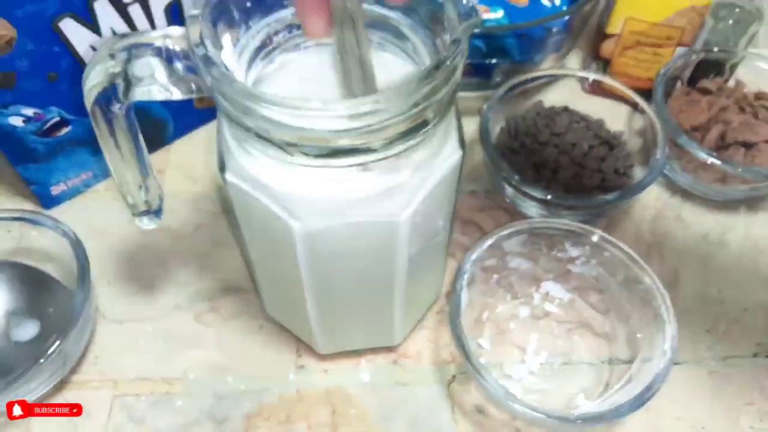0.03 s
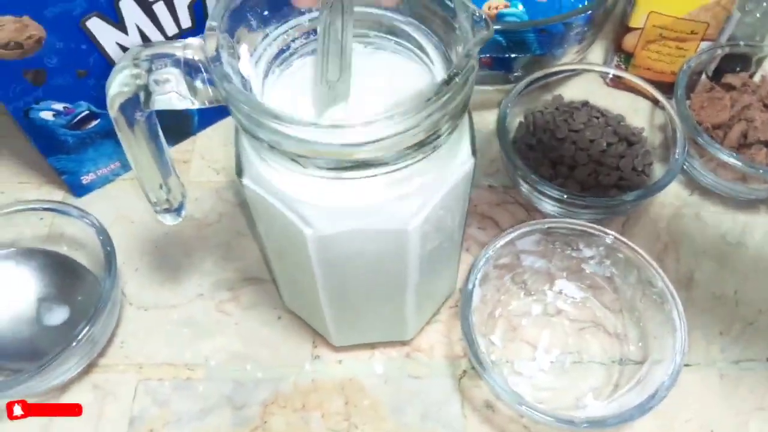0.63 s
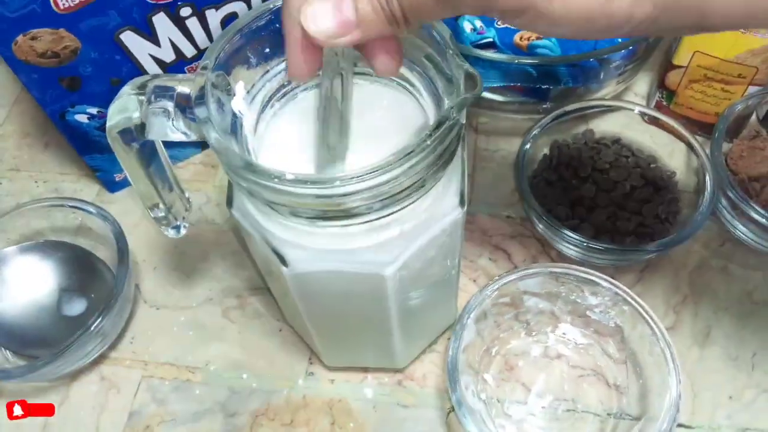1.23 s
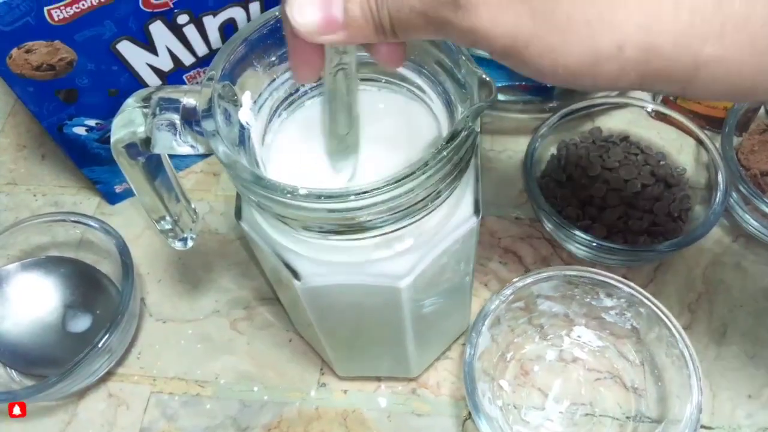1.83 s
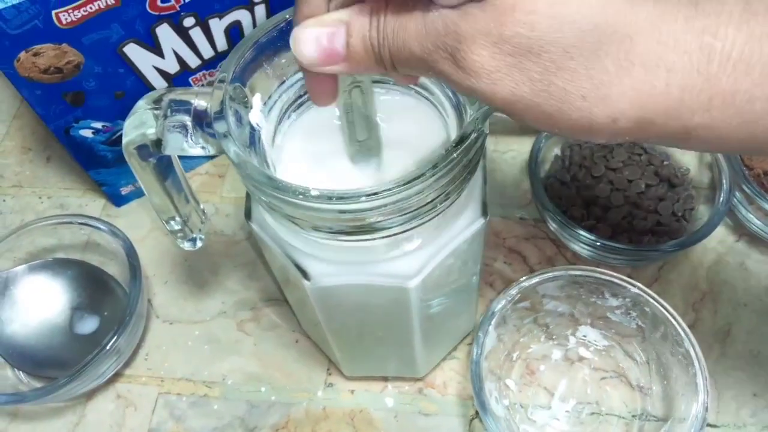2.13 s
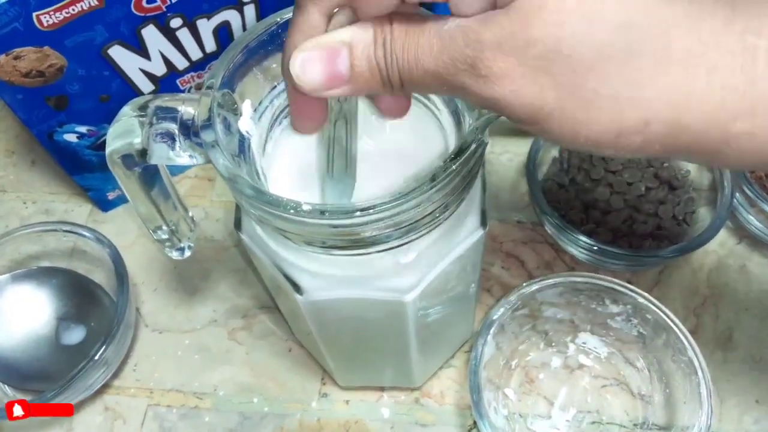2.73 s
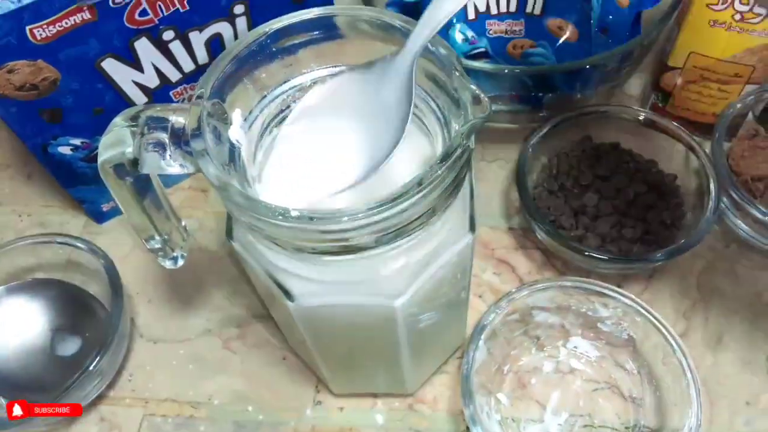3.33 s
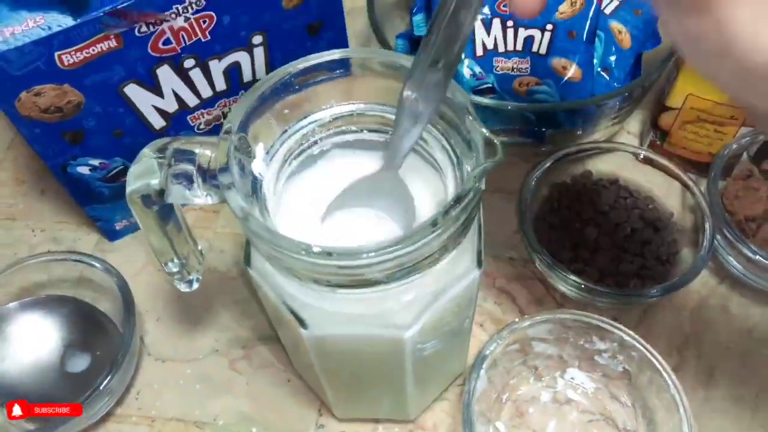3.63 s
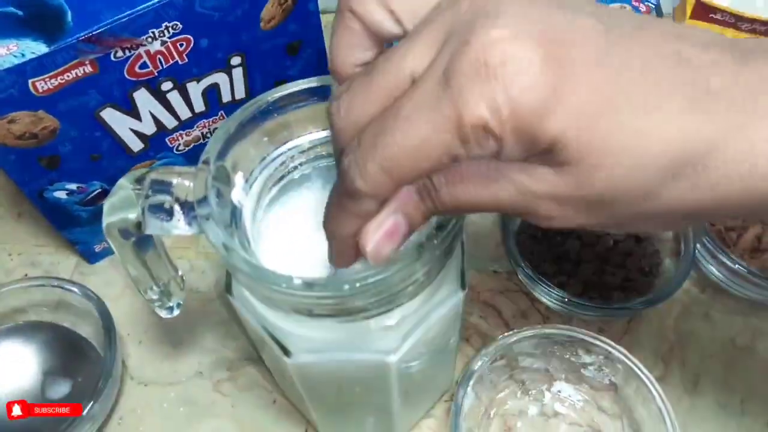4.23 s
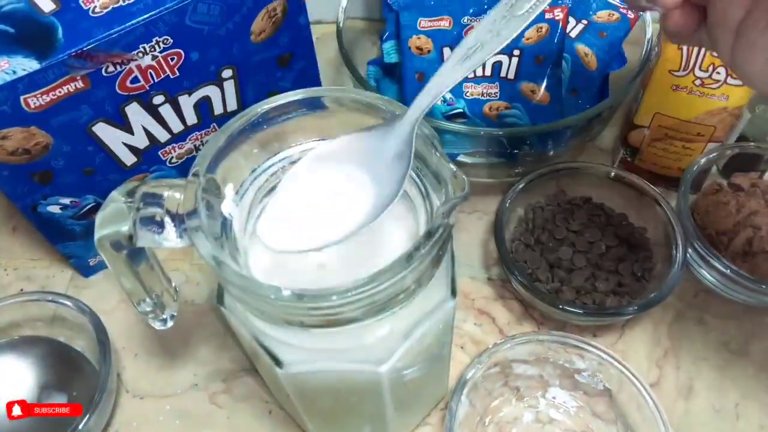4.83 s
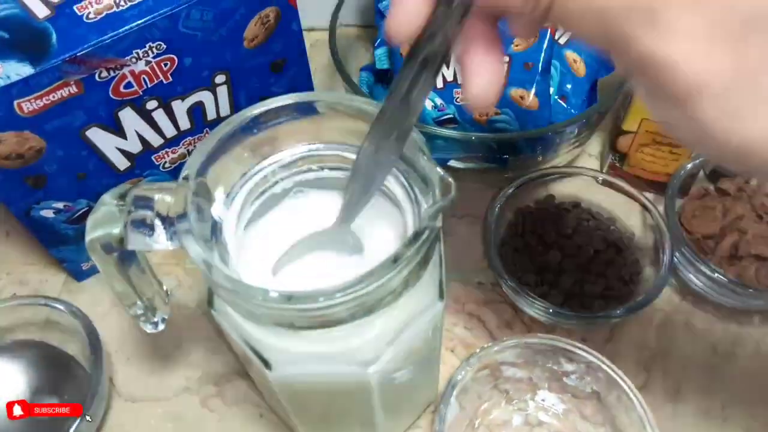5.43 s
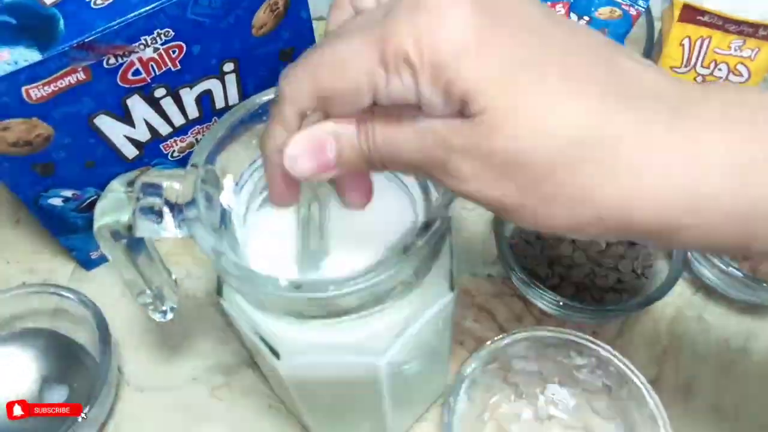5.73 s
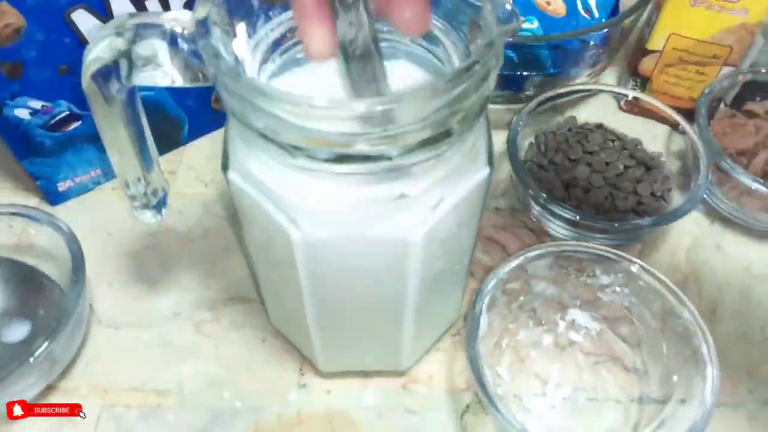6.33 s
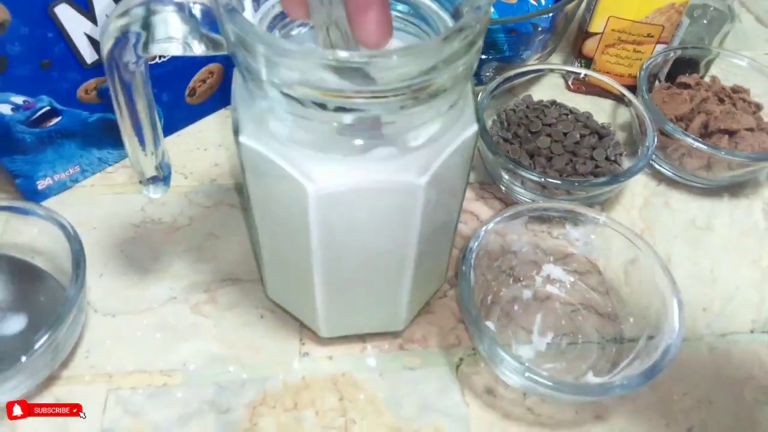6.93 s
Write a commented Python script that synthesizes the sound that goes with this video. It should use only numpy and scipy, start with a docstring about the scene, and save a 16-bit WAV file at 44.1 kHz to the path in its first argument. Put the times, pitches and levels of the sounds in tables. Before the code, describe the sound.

From the start, a steel spoon stirs milk in a thick glass jug, close by. It makes bright, short, damped clinks, around a dozen a second and uneven in strength, with gritty little scrapes between them. The milk sloshes softly underneath, with an occasional small plop. The stirring is liveliest around 2 seconds and dies away just after 3. At about 3.9 seconds comes one sharper, ringing clink, followed by a few lighter taps and a small gulp of milk until 4.6. After a near-silent pause, the stirring resumes at 5.5 seconds, with quick, slightly more ringing clinks, stronger, faintly squeaky scrapes and more plops, continuing to the end at about 7 seconds. The small kitchen gives a very short echo, and a faint steady hiss and whirr lie behind everything.

```python
"""Stirring milk in a glass jug

A steel spoon goes round a thick glass jug in two bouts, with a few loose taps between. Each touch
rings glass and spoon briefly, damped by the milk and the fingers. Between touches the spoon drags
over the glass while the milk sloshes and plops. A small kitchen answers, over faint hiss and whirr."""
import sys
import numpy as np
from scipy import signal
from scipy.fft import rfft, irfft, next_fast_len
from scipy.io import wavfile

SR = 44100
rng = np.random.default_rng(int(sys.argv[2]) if len(sys.argv) > 2 else 0)


def inscribe(sig):
    """Save sig as 16-bit PCM at rate SR to the path in sys.argv[1].

    A 1-D sig is mono; a 2-D sig holds one channel per row.
    Samples are clipped to [-1, 1] before scaling.
    """
    pcm = np.round(np.clip(np.atleast_2d(sig).T, -1, 1) * 32767)
    wavfile.write(sys.argv[1], SR, pcm.astype(np.int16))


N = 307377
AGE = np.arange(int(.16 * SR)) / SR   # seconds into one short ring

# Spoon meets glass. Each row: start in seconds, strength in dB, body knock in dB re strength,
# hardness in dB (high for the spoon's edge, low for its back), pitch in Hz.
TOUCHES = [(0.0136, -26, -5.5, -5.5, 4060), (0.0343, -38.5, -5.5, 2, 4100), (0.0822, -26.0, -12, 3, 4160),
           (0.1777, -29, -1.5, -2.0, 3330), (0.2451, -30, -8.0, 5.5, 4260), (0.285, -36.5, -4, 5.5, 4630),
           (0.3399, -25.5, -4.5, -4.5, 3580), (0.399, -31, -11.5, 2.5, 3670),
           (0.4469, -34.5, -10.5, 2.5, 4370), (0.4985, -28, -7.5, -2, 3520), (0.5506, -25.5, -13, 1, 3740),
           (0.5951, -28.5, -7.5, 2.5, 3700), (0.6644, -26, -9, -1.5, 3600), (0.7564, -37, 3, 7, 4100),
           (0.7697, -33, -17, 0.5, 4020.0), (0.8243, -29, -4.5, -1.5, 3610), (0.8408, -43.5, 6, 2, 4300),
           (0.9172, -28, -14, -2.5, 3930), (0.9653, -37.5, -5, -1.0, 3500), (1.029, -34, -2.5, 7.5, 3840),
           (1.0612, -28.5, -7, 4, 4100), (1.143, -37.0, 4.5, 0.5, 4450.0),
           (1.1854, -37.5, -3, 10.5, 3740.0), (1.316, -38.5, 0, 2, 4470.0),
           (1.3354, -27.5, -15.5, 3.5, 3930), (1.3623, -31, -7, 5.0, 3520), (1.3739, -34, -3.5, 1.0, 4300),
           (1.4772, -25.5, -8, -1, 3830.0), (1.5322, -29.5, -13, -1, 4280),
           (1.5663, -30.5, -4.5, -8, 3950.0), (1.5745, -38.0, -18, 8.5, 3480.0),
           (1.5956, -37.5, 8, 3, 4370.0), (1.6293, -33.5, -12.5, 3.5, 4400), (1.635, -33.5, -2, 8, 4270.0),
           (1.6659, -27.5, -9.5, -1.5, 4350), (1.7209, -33, -10, -1, 3490), (1.7742, -31.5, -7, 9.5, 3700),
           (1.7892, -41.5, 5, 9, 4400), (1.8134, -33, -8, 0, 4200.0), (1.9571, -39.5, -2, -2, 4120),
           (2.0031, -36, 3.5, 3.5, 3320.0), (2.0493, -30.0, -8, 4, 3980), (2.0831, -27, -9.5, 0, 4330),
           (2.1253, -39.5, 6.5, 1.5, 4430), (2.1616, -29.5, -9, -5, 3680), (2.167, -38.5, 3.5, 2, 4290.0),
           (2.2024, -31, -16, 6.5, 4300), (2.23, -29.5, -7.5, 1.5, 4000), (2.2449, -33.5, 1, -15, 4030),
           (2.3088, -38, 2, 3, 4000), (2.3689, -38.5, -2, 3.5, 4000), (2.392, -28.5, -7.5, -3.5, 4080),
           (2.4443, -30.5, -3, -7, 3430.0), (2.5445, -35.5, -6, 1.5, 3950.0),
           (2.5608, -38.0, -7, 0, 4340.0), (2.6151, -26.5, -7, -7.5, 4320), (2.6686, -31.5, -6.5, -2, 4210),
           (2.723, -32, -11.5, 0, 4100), (2.728, -32.5, -10.0, -5, 4040), (2.8102, -38, 4.5, -1, 3680),
           (2.8916, -32, -1, 6.5, 3990), (2.9626, -35.5, 0, 4.5, 3680.0), (2.99, -34.5, -3.5, -5, 3890.0),
           (3.0301, -35, -6, 6.5, 4300), (3.0593, -37, -2.5, 0, 3520), (3.139, -43.5, -7, -3, 3610),
           (3.9113, -19.5, -27, -12.5, 3620), (3.9853, -39, 1, 4.5, 4190.0),
           (4.0123, -39.5, -10, 6.5, 3840), (4.1436, -33, -14, -2.5, 3960.0), (4.2352, -43, -3, -9, 3320),
           (4.3044, -34.5, -2.5, 0.5, 4360.0), (4.3965, -35.5, -15.5, -12, 4280),
           (4.4265, -28.0, -14.5, -3, 3670), (4.6034, -43.5, -5.5, -9, 3750),
           (5.5349, -26.5, -8.5, -10.5, 3750), (5.6015, -33.5, -7.5, -10, 4270.0),
           (5.7046, -25, -22, 1, 4140), (5.7209, -28.0, -17, -2.5, 4200), (5.8078, -29.5, -7.5, -3.5, 3750),
           (5.8889, -32.5, -4, 2, 4130.0), (5.9049, -26.5, -42, -6, 4210), (5.9346, -34, -20, -2, 4210),
           (5.9758, -35.5, 2, 2.5, 3680.0), (6.073, -26.5, -21, 3, 4360), (6.134, -29, -11, -13, 3640),
           (6.15, -31.5, -6, -3.5, 3850), (6.1886, -24.5, -35, -2.5, 3830), (6.2278, -26, -15, -2.5, 4290),
           (6.302, -26.5, -7.5, -4, 3570), (6.3254, -31.5, -4.5, -2, 3850), (6.3715, -34, -28, 0, 3900),
           (6.3926, -26.5, -16, 1.5, 3690), (6.4609, -24.5, -20, -9.5, 3480),
           (6.5371, -22, -18, -0.5, 4190), (6.6238, -39, 6, 6.5, 3360), (6.7001, -27, -15, 4, 3670.0),
           (6.7658, -29.5, -7.5, -2.5, 3590.0), (6.8117, -25, -14, -3, 3530),
           (6.858, -28.5, -17.5, 4.0, 3520), (6.9348, -37.5, -5, 3.5, 3770),
           (6.9545, -28.0, -3.5, -4, 4370)]
# A loosely held spoon rings longer and lets the wall sing. Each row: time in seconds, looseness in dB.
GRIP = [(0, -5), (1.6, -3.5), (3.1, -5), (3.9, 5), (4.3, -5.5), (5.54, 11), (5.75, -0.5), (6.97, 6.5)]
# Modes of the free wall above the milk, of the main clink, and the high ones of spoon and glass.
# Each row: pitch in Hz, relative level in dB, t60 in seconds before grip or pressure alters it.
WALL_MODES = [(2434, -2, 0.033), (2573, -2.5, 0.069), (2960, -11, 0.025)]
CLINK_MODES = [(3595, -12.5, 0.044), (3750, 0.5, 0.014), (3820, -13, 0.035), (4290, -9.5, 0.081),
               (4290, -9, 0.064)]
TREBLE_MODES = [(5820, -12.5, 0.16), (6090, -11, 0.035), (6377, 5.5, 0.031), (6770, -0.5, 0.061),
                (7280, -14, 0.034), (7480, -13, 0.11), (7930, -2.5, 0.024), (8640, -7, 0.035),
                (10430, -27, 0.044)]
# The crowd of short-lived modes in a contact's crack. Each row: frequency in Hz, spectral level in dB.
CRACK_COLOUR = [(150, -35), (400, -17.5), (1000, -5.5), (1900, -11), (3000, 4), (4000, 9), (5100, 0),
                (6600, 4), (8500, -2), (10500, -14), (13800, -29), (16000, -21.5)]
# Air pockets closing behind the spoon.
# Each row: start in seconds, level in dB, first bubble's pitch in Hz, number of bubbles.
AIR_POCKETS = [(0.179, -19, 1765, 1), (1.257, -29.5, 1180, 1), (1.566, -25.5, 1860, 1),
               (2.312, -18.5, 987, 1), (3.166, -34.5, 690, 2), (4.269, -30.5, 1070, 2),
               (4.279, -26, 420, 3), (4.478, -40.5, 1260, 2), (5.188, -46, 1210, 1),
               (5.537, -24.5, 1496, 1), (5.812, -26.5, 1150, 1), (5.992, -28, 1310, 3),
               (6.252, -27, 1464, 1), (6.415, -32, 1890, 1), (6.589, -33, 1590, 1)]


def clinks(usual_t60=0.033, usual_hz=3920, usual_db=-33, rise_s=0.0013, rebound_s=.014):
    """Each touch cracks and rings in four registers, balanced by grip and hardness, then bounces once."""
    # Low modes of the filled jug. Each row: pitch in Hz, relative level in dB, nominal t60 in seconds.
    body_modes = [(432.3, -17, 0.11), (718, -7.5, 0.019), (1021.6, -1, 0.063), (1293, -19.5, 0.18),
                  (1519, -3, 0.035), (2290, -29, .04)]
    start, db, knock_db, hard_db, hz = np.transpose(TOUCHES)[:, :, None]
    loose_db = curve(GRIP, start)
    t60 = usual_t60 * from_db(0.14 * loose_db)
    damping = np.sqrt(usual_t60 / t60)
    # hard or forceful touches are over sooner
    slowness = from_db(-0.42 * hard_db - 0.64 * (db - usual_db))
    rise = 1 - np.exp(-AGE / (rise_s * slowness))

    def register(rings, crack_db, band_hz):
        """Hard or tightly damped touches have more crack and less ring."""
        crack = from_db(crack_db + 0.11 * hard_db) * damping ** 2 * cracks(band_hz, slowness)
        return unit_attack(unit_attack(rings * rise) + crack)

    # the strongest mode moves with the grip and the depth of the spoon
    main_mode = from_db(5) * np.sin(2 * np.pi * hz * AGE) * dying(AGE, t60)
    clink = register(main_mode + ringing(CLINK_MODES, damping, detune=0.0098),
                     crack_db=-4 - loose_db / 2, band_hz=(3200, 5000))
    body = register(ringing(body_modes, damping, detune=0.02), crack_db=-1, band_hz=(100, 2000))
    wall = register(ringing(WALL_MODES, from_db(-loose_db / 2), detune=0.012),
                    crack_db=-2 - loose_db, band_hz=(2000, 3200))
    treble = register(ringing(TREBLE_MODES, damping, detune=0.0169),
                      crack_db=2 - 0.73 * loose_db, band_hz=(5000, 15200))
    # loose, knocking or low-pitched touches drive the wall harder
    wall_db = -4.5 + 0.13 * loose_db + 0.22 * knock_db - 13 * np.log2(hz / usual_hz)
    timbre = clink + from_db(knock_db) * body + from_db(wall_db) * wall + from_db(hard_db) * treble
    hits = from_db(db) * timbre
    out = np.zeros(N)
    for at, hit, (late, lively) in zip(start[:, 0], hits, rng.standard_normal((len(hits), 2))):
        add(out, at, hit)
        add(out, at + rebound_s * np.exp(late / 2), from_db(-16.5 + 3 * lively) * hit)
    return out


def ringing(modes, damping, detune, uneven_db=2.5):
    """One ring per touch: the contact point sets each mode's strength, swirling milk shifts its pitch."""
    rings = 0
    for hz, db, t60 in modes:
        strength, shift, side = rng.standard_normal((len(TOUCHES), 3)).T[:, :, None]
        swing = np.sin(2 * np.pi * hz * (1 + detune * shift) * AGE) * np.sign(side)
        rings = rings + from_db(db + uneven_db * strength) * swing * dying(AGE, t60 / damping)
    return rings


def cracks(band_hz, slowness, contact_s=0.0016, tail_db=-13, tail_t60=0.18):
    """One crack per touch: a burst while steel chatters on glass, then the crowd of modes dies away."""
    size = len(TOUCHES) * len(AGE)
    crowd = band(noise(CRACK_COLOUR, next_fast_len(size)), band_hz)
    crowd = crowd[:size].reshape(len(TOUCHES), -1)
    progress = AGE / (contact_s * slowness)
    burst = progress * np.exp(1 - progress)
    return unit_attack(crowd * (burst + from_db(tail_db) * dying(AGE, tail_t60)))


def ticks():
    """The spoon's tip brushes the glass at random, louder as the stirring gets livelier."""
    force = excite(abs(grains(per_s=22, spread_db=2.5)), dying(AGE, t60=.014))
    return from_db(vigour() - 3) * unit_rms(force * band(noise(CRACK_COLOUR, N), (940, 15000)))


def dragging(t60_scale=0.34, squeak_hz=6550, squeak_width_hz=1000):
    """Slips of steel over glass, a few strong among many tiny, ring the modes the pressed spoon damps."""
    slips = abs(grains(per_s=1500, spread_db=5.5)) / 2 + abs(grains(per_s=140, spread_db=5))
    force = excite(slips, dying(AGE, t60=0.011))
    loose_db = curve(GRIP, np.arange(N) / SR)

    def rubbed(modes):
        """Each mode feels the slips in its own way."""
        rings = 0
        for hz, db, t60 in modes:
            ring = np.sin(2 * np.pi * hz * AGE) * dying(AGE, t60 * t60_scale)
            rings = rings + from_db(db) * excite(force * rng.standard_normal(N), ring)
        return unit_rms(rings)

    grit = unit_rms(force * band(noise(CRACK_COLOUR, N), (1330, 10500)))
    # the bowl of a loosely held spoon sings out as it skids
    squeak = force * rng.standard_normal(N)
    for _ in range(2):
        squeak = resonate(squeak, squeak_hz, squeak_width_hz)
    wall = from_db(loose_db - 6) * rubbed(WALL_MODES)
    glass = wall + from_db(-2) * rubbed(CLINK_MODES) + from_db(-3) * rubbed(TREBLE_MODES)
    return unit_rms(glass + from_db(1 - loose_db / 2) * grit + from_db(loose_db - 2) * squeak)


def pressure(drag_db=-51, usual_vigour_db=-42.5, skid_db=-22.5, fade_s=0.017):
    """The spoon's pressure as a gain: a running drag, a skid after each touch, and the scrapes."""
    # The spoon pressed along the wall. Each row: start in seconds, length in seconds, level in dB.
    scrapes = [(0.274, 0.065, -37), (1.198, 0.069, -41), (1.787, 0.21, -41), (5.565, 0.085, -47.5),
               (5.658, 0.049, -32.5), (5.754, 0.036, -36), (5.975, 0.047, -38.5), (6.392, 0.067, -36.5),
               (6.528, 0.064, -34), (6.624, 0.075, -32.5)]
    power = from_db(drag_db + 1.8 * (vigour() - usual_vigour_db)) ** 2
    for start, db, *_ in TOUCHES:
        add(power, start, (from_db(db + skid_db) * dying(AGE, t60=.25)) ** 2)
    for start, length_s, db in scrapes:
        t = np.arange(int(length_s * SR)) / SR
        swell = np.minimum(np.minimum(t, length_s - t) / fade_s, 1)
        add(power, start, (from_db(db) * swell) ** 2)
    return np.sqrt(power)


def vigour(settle_db_per_s=40):
    """How hard the milk is stirred, in dB; it calms down outside the bouts."""
    # One curve for each bout of stirring. Each row: time in seconds, vigour in dB.
    bouts = [
        [(0.0, -52), (0.39, -46.5), (0.85, -48), (1.74, -40.5), (2.28, -42), (2.96, -49), (3.3, -63)],
        [(5.55, -80), (5.588, -45), (5.712, -51.5), (6.162, -44.5), (6.526, -41.5), (6.902, -51), (6.97, -54)],
    ]
    t = np.arange(N) / SR
    levels = []
    for bout in bouts:
        outside_s = abs(t - np.clip(t, bout[0][0], bout[-1][0]))
        levels.append(curve(bout, t) - settle_db_per_s * outside_s)
    return np.max(levels, axis=0)


def lulls(flight_s=0.031, threshold_db=-33):
    """A gain that dips while the spoon flies free towards a blow: the stronger the blow, the deeper."""
    dip_db = np.zeros(N)
    ramp = np.minimum(np.linspace(0, 2, int(flight_s * SR)), 1)
    for start, db, *_ in TOUCHES:
        add(dip_db, start - flight_s, 1.2 * max(db - threshold_db, 0) * ramp)
    return from_db(-dip_db)


def sloshing(ring_cycles=24, churn_db=-2):
    """Small bubbles of many sizes ride on a lumpy churning, coloured by the hollow of the jug."""
    # The jug's hollow. Each row: frequency in Hz, level in dB.
    hollow = [(165, -14), (280, -28.5), (430, 2.5), (540, -12), (800, -1), (970, 6), (1180, -2),
              (1450, -2), (2300, -9), (4500, -31)]
    bubbles = 0
    for hz in np.geomspace(250, 2300, 30):
        births = grains(per_s=hz / 50, spread_db=5.5)
        ring = bubble(hz, t60=ring_cycles / hz, climb=0.19)
        bubbles = bubbles + from_db(curve(hollow, hz)) * excite(births, ring)
    surges = excite(abs(grains(per_s=110, spread_db=4)), AGE * dying(AGE, t60=.05))
    churn = unit_rms(surges * noise(hollow, N))
    return unit_rms(unit_rms(bubbles) + from_db(churn_db) * churn)


def waves(swirl_db=-2.5, wake_db=-1.5, splash_db=-10.5, rise_s=0.0042):
    """The milk's motion as a gain: the swirl, a wake after each knock and a splash round each gulp."""
    power = from_db(swirl_db + vigour()) ** 2 * lulls()
    wake = (1 - np.exp(-AGE / rise_s)) * dying(AGE, t60=0.15)
    for start, db, knock_db, *_ in TOUCHES:
        add(power, start, (from_db(db + knock_db + wake_db) * wake) ** 2)
    for start, db, _, count in AIR_POCKETS:
        if count > 1:
            add(power, start, (from_db(db + splash_db) * wake) ** 2)
    return np.sqrt(power)


def plops(gap_s=0.00563, pitch_ratio=.61, loss_db=6.5):
    """An air pocket closes as one bubble, or gulps as a chain of them, each larger and weaker."""
    out = np.zeros(N)
    for start, db, hz, count in AIR_POCKETS:
        for k in range(count):
            ring = bubble(hz * pitch_ratio ** k, t60=0.047, climb=0.255)
            add(out, start + k * gap_s, from_db(db - k * loss_db) * ring)
    return out


def bubble(hz, t60, climb, onset_cycles=0.41):
    """A bubble swells, rings and climbs in pitch as it nears the surface."""
    phase = 2 * np.pi * hz * (AGE + climb * AGE ** 2 / (2 * t60))
    swell = 1 - np.exp(-AGE * hz / onset_cycles)
    return np.sin(phase) * dying(AGE, t60) * swell


def kitchen(x, tail_db=-14, tail_t60=0.17, delay_s=0.0055):
    """The short, dense tail of a small hard room."""
    # What the walls throw back. Each row: frequency in Hz, relative level in dB.
    room_colour = [(150, 13), (450, 2.5), (2500, -4.5), (6500, -9), (16000, -11)]
    t = np.arange(SR // 2) / SR
    echo = noise(room_colour, len(t)) * dying(t, tail_t60) * (t > delay_s)
    return from_db(tail_db) * excite(x, echo / np.sqrt(np.sum(echo ** 2)))


def background(hiss_db=-59):
    """A steady hiss with a low hum and bands of whirr."""
    # The colour of the hiss. Each row: frequency in Hz, spectral level in dB.
    hiss_colour = [(25, -31), (80, -1), (400, 9.5), (1200, -1), (4500, 0), (9000, -2.5), (13000, -16),
                   (16000, -20)]
    # Hum and whirr. Each row: centre in Hz, width in Hz, rms level in dB.
    whirr_bands = [(100, 42, -71), (1793, 99, -65), (2715, 150, -61.5), (3275, 220, -58), (5720, 340, -64),
                   (6470, 240, -69)]
    whirr = sum(from_db(db) * resonate(rng.standard_normal(N), hz, width) for hz, width, db in whirr_bands)
    return from_db(hiss_db) * noise(hiss_colour, N) + whirr


def from_db(db):
    """Decibels to gain."""
    return 10 ** (np.asarray(db) / 20)


def unit_rms(x):
    """Scale to rms 1."""
    return x / np.sqrt(np.mean(x ** 2) + 1e-20)


def unit_attack(hits, attack_s=.01):
    """Scale each hit (row) to rms 1 over its attack."""
    return hits / np.sqrt(np.mean(hits[:, :int(attack_s * SR)] ** 2, axis=1, keepdims=True) + 1e-20)


def dying(t, t60):
    """A decay that loses 60 dB in t60 seconds."""
    return np.exp(-np.log(1000) * t / np.maximum(t60, 1e-3))


def curve(points, at):
    """Read a value off straight lines between points."""
    return np.interp(at, *np.transpose(points))


def add(track, start_s, sound):
    """Mix a sound into the track."""
    at = max(int(start_s * SR), 0)
    track[at:at + len(sound)] += sound[:max(N - at, 0)]


def excite(drive, response):
    """Every sample of the drive sets off the response."""
    return signal.oaconvolve(drive, response)[:N]


def noise(colour, size):
    """Noise of a given colour, rms 1."""
    hz, db = np.transpose(colour)
    bins = np.maximum(np.fft.rfftfreq(size, 1 / SR), 1)
    gain = from_db(np.interp(np.log(bins), np.log(hz), db))
    return unit_rms(irfft(rfft(rng.standard_normal(size)) * gain, size))


def grains(per_s, spread_db):
    """Random clicks of very uneven size."""
    sizes = from_db(spread_db * np.minimum(rng.exponential(1, N), 4))
    return (rng.random(N) < per_s / SR) * sizes * rng.choice([-1, 1], N)


def band(x, band_hz):
    """Band-pass between two edges."""
    return signal.sosfilt(signal.butter(4, band_hz, "band", fs=SR, output="sos"), x)


def resonate(x, hz, width_hz):
    """One broad resonance, rms 1."""
    return unit_rms(signal.lfilter(*signal.iirpeak(hz, hz / width_hz, fs=SR), x))


def scene(clink_db=-.5, lowest_hz=135):
    """Spoon, milk and kitchen over the steady background."""
    spoon = from_db(clink_db) * clinks() + lulls() * ticks() + pressure() * dragging()
    milk = waves() * sloshing() + plops()
    # spoon and milk carry no deep bass
    jug = signal.sosfilt(signal.butter(2, lowest_hz, "high", fs=SR, output="sos"), spoon + milk)
    return (jug + kitchen(jug) + background())[None]


def record(dry, port_hz=15350, port_q=17, port_db=14, cutoff_hz=16000):
    """The microphone port resonates in the top octave; above it the sound is cut steeply."""
    port = from_db(port_db) * signal.lfilter(*signal.iirpeak(port_hz, port_q, fs=SR), dry)
    return signal.sosfilt(signal.ellip(10, .2, 80, cutoff_hz, fs=SR, output="sos"), dry + port)


dry = scene()
out = record(dry)
inscribe(out)
```